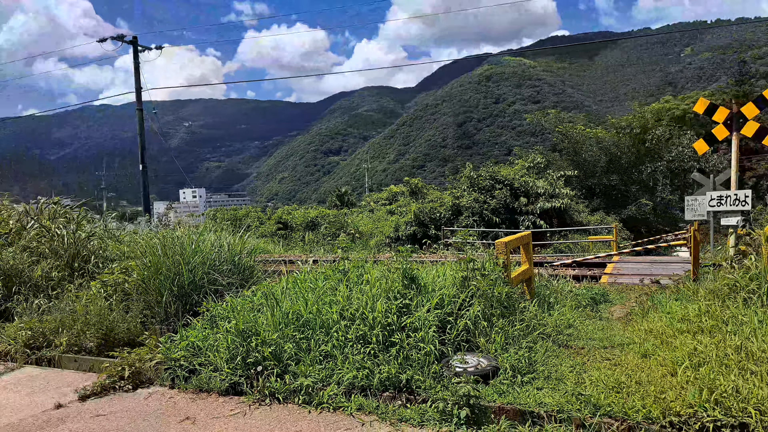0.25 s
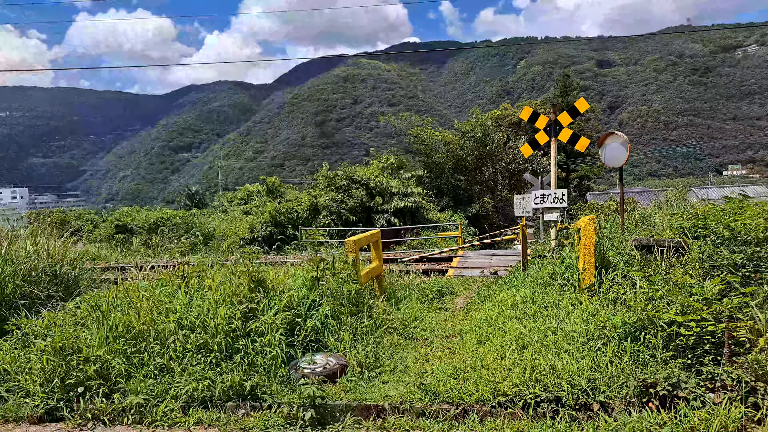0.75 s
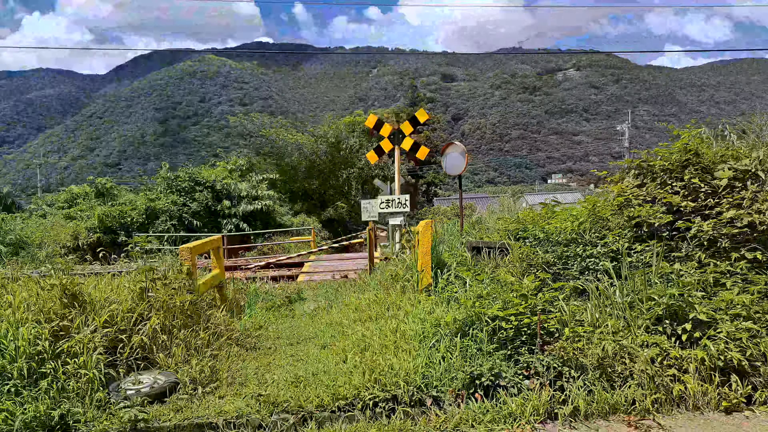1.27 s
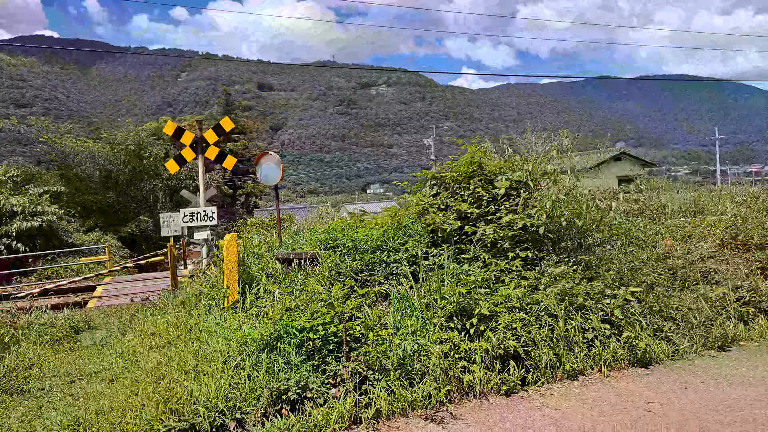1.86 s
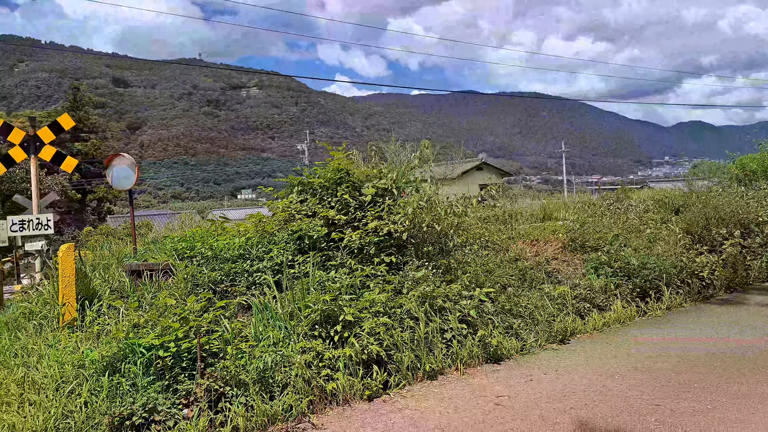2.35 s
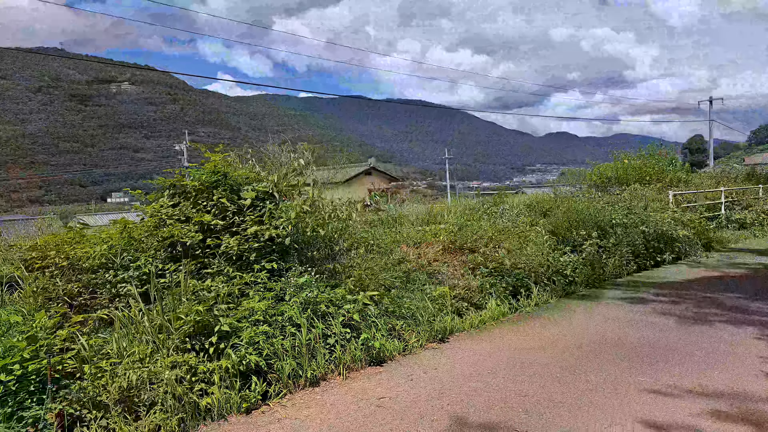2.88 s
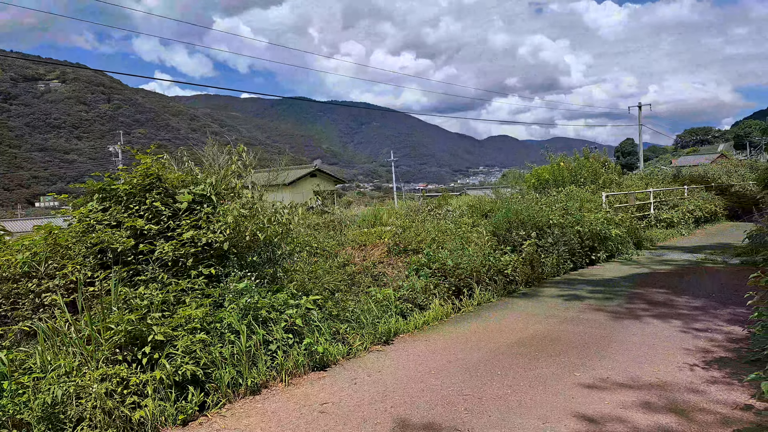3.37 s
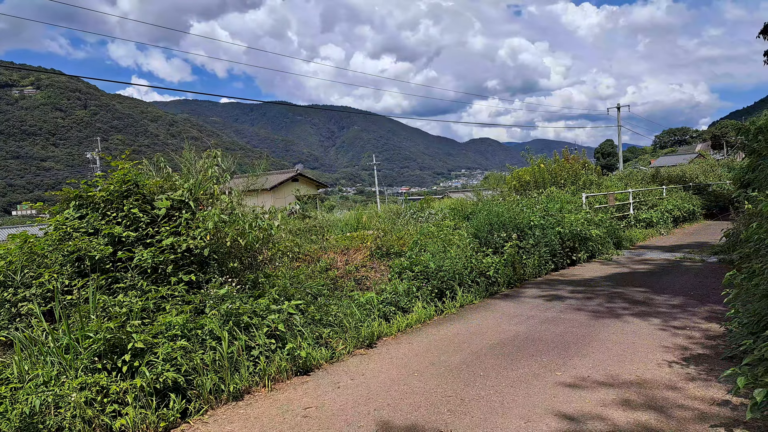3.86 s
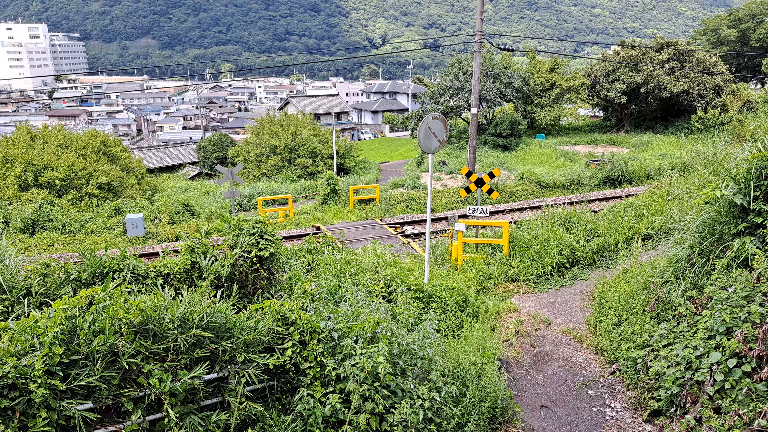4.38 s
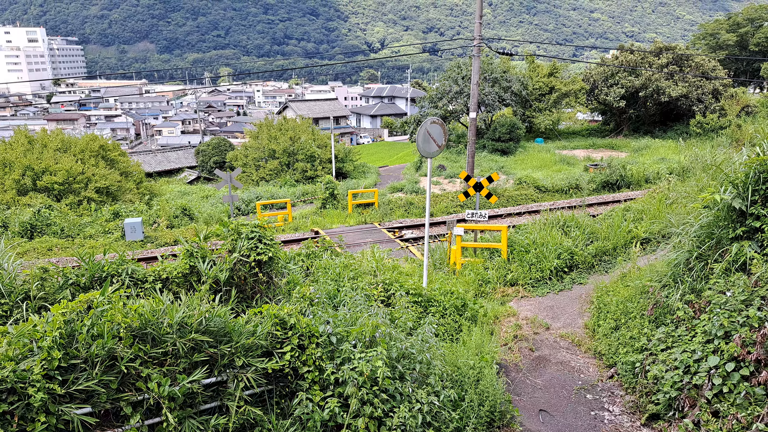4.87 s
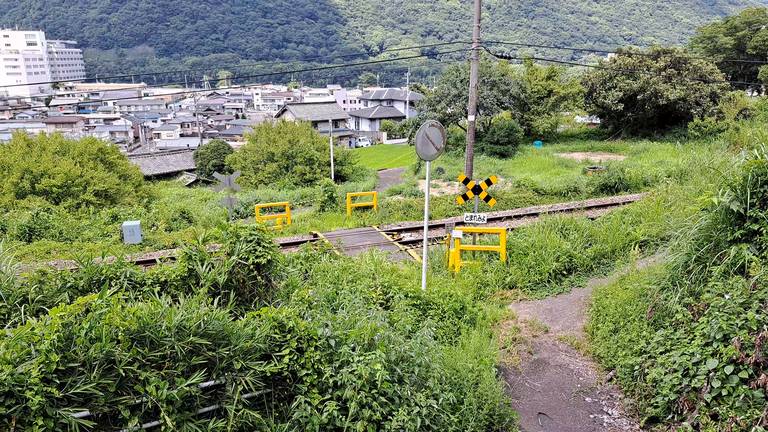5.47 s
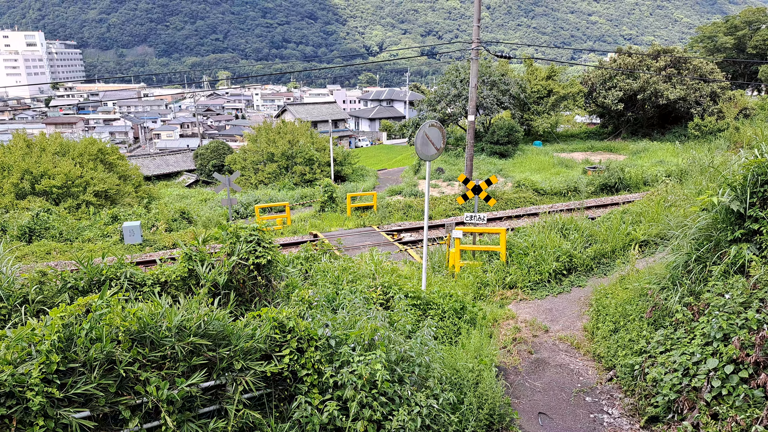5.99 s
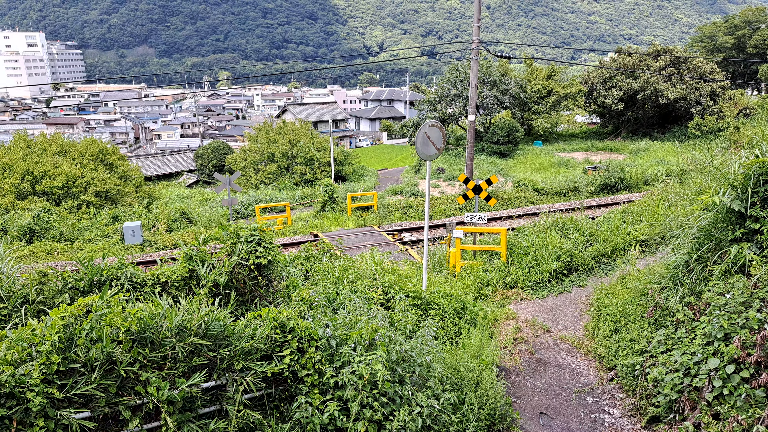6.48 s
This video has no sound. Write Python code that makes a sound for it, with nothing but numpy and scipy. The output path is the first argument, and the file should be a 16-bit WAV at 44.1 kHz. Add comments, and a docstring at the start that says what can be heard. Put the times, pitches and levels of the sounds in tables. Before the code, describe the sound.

Outdoors beside a grassy lane, a dense chorus of cicadas buzzes brightly, one close on the left, with bush crickets sizzling above. Wind thumps the right side of the microphone, strongest after one second, and a thin insect whistle joins. Just after four seconds the sound cuts, nearly silent for an instant, to a hillside with much softer insects, low distant town rumble and far birds chirping.

```python
"""Many cicadas buzz in the bushes beside a lane, one close by, as trains of clicks ringing through insect bodies.
Bush crickets throb at the top of the treble: noisy tooth strokes over a haze. Gusts of low noise hit the right
microphone, mostly at this first spot, and one insect whistles thinly.
After a cut, with a moment of near silence, we are up the hill: softer insects, the town rumbling below as
shaped low noise, and far birds calling in sliding tones."""
import sys
import numpy as np
from scipy import signal
from scipy.fft import rfft, irfft, next_fast_len
from scipy.io import wavfile
from scipy.ndimage import uniform_filter1d

SR = 44100
rng = np.random.default_rng(int(sys.argv[2]) if len(sys.argv) > 2 else 0)


def persist_wave(psi):
    """Save psi, clipped to +-1, as 16-bit WAV."""
    counts = np.round(np.clip(psi, -1, 1) * 32767).astype(np.int16)
    wavfile.write(sys.argv[1], SR, np.atleast_2d(counts).T)


N = 296793
TIME = np.arange(N) / SR
ECHO_SAMPLES = 8192
SIZE = next_fast_len(N + ECHO_SAMPLES)   # room for the echoes after the sound
HZ = np.maximum(np.arange(SIZE // 2 + 1) * SR / SIZE, 1)   # the pitch of each step in a spectrum
VOICE_SPLIT_HZ, CICADA_TOP_HZ = 7000, 10500


def from_db(db):
    """Decibels to gain."""
    return 10 ** (np.asarray(db) / 20)


def rms_one(x):
    """Each channel scaled to unit power."""
    return x / np.sqrt(np.mean(x ** 2, axis=-1, keepdims=True) + 1e-20)


def in_time(rows):
    """The columns of a curve, one value per sample."""
    seconds, *columns = np.transpose(rows)
    return [np.interp(TIME, seconds, column) for column in columns]


def panned(left_db):
    """Left and right gains of unit mean power; left_db is left minus right."""
    gains = from_db(np.array([[.5], [-.5]]) * left_db)
    return gains / np.sqrt(np.mean(gains ** 2, axis=0))


def drift(rate):
    """Smooth chance of spread 1 that changes about rate times a second."""
    knots = rng.standard_normal(int(N / SR * 2 * rate) + 3)
    return rms_one(np.interp(TIME * 2 * rate, np.arange(len(knots)), knots))


def band(low_hz, high_hz, order=24):
    """Gain of a flat band; a higher order gives steeper edges."""
    low_edge = 1 + (low_hz / HZ) ** (2 * order)
    high_edge = 1 + (HZ / high_hz) ** (2 * order)
    return (low_edge * high_edge) ** -.5


def colour(points):
    """Left and right gains drawn through the points of a colour table."""
    hz, *sides = np.transpose(points)
    return from_db([np.interp(np.log(HZ), np.log(hz), side) for side in sides])


def resonance(hz, width_hz):
    """Response of one resonance, 1 on top."""
    return 1 / (1 + 1j * (HZ ** 2 - hz ** 2) / (HZ * width_hz))


def sounding(spectrum):
    """A spectrum turned into sound of unit power."""
    return rms_one(irfft(spectrum, SIZE)[..., :N])


def foliage(x, t60, scatter_db):
    """Spectrum at two microphones: the direct sound, then a dying spray of echoes from leaves and ground."""
    t = np.arange(ECHO_SAMPLES) / SR
    paths = rng.standard_normal((2, len(t))) * from_db(-60 * t / t60)   # 60 dB down after t60 seconds
    paths *= from_db(scatter_db) / np.linalg.norm(paths, axis=1, keepdims=True)
    paths[[0, 1], rng.integers(0, 18, 2)] += 1   # direct sound, up to 17 samples late on each side
    return rfft(x, SIZE) * rfft(paths, SIZE)


def tymbal(per_s, jitter, uneven_db, count=16000):
    """Ribs buckle one after another: a train of clicks, uneven in time and strength."""
    chance = rng.standard_normal((count, 2))
    gaps = np.abs(1 + jitter * chance[:, 0])
    at = (np.cumsum(gaps) / per_s * SR).round().astype(int)
    return np.bincount(at[at < N], from_db(uneven_db * chance[at < N, 1]), N)


def throb(per_s, depth_db, wander=0.038):
    """Level swings with the strokes of the body, whose pace wanders a little."""
    turns = rng.random() + np.cumsum(per_s * (1 + wander * drift(2.1))) / SR
    return from_db(depth_db * np.sin(2 * np.pi * turns))


def cicada_group(throb_db, flutter_db, haze_db, count=5):
    """Several cicadas, each with its own click rate, throb and echoes, over the blur of countless farther ones."""
    out = from_db(haze_db) * rfft(rng.standard_normal((2, N)), SIZE)
    for _ in range(count):
        song = rms_one(tymbal(rng.uniform(230, 560), jitter=.05, uneven_db=1.5))
        song = song * throb(rng.uniform(14, 20), throb_db) * from_db(flutter_db * drift(9))
        out = out + foliage(song, t60=0.1, scatter_db=8)
    return out


def shimmer(spectrum, depth_db, count=6):
    """Singers at neighbouring pitches swell and fade apart: overlapping bands, sharing a few slow gains in turn."""
    spacing_hz = 220
    swells = from_db(depth_db * np.array([drift(7) for _ in range(count)]))
    out = 0
    for k, swell in enumerate(swells):
        away = np.abs((HZ / spacing_hz - k) % count - count / 2)
        share = np.maximum(1 - away, 0)
        out = out + swell * irfft(spectrum * share, SIZE)[:, :N]
    return rms_one(out)


# How loud the cicadas are at each spot, before the gains given in scene().
# Each row: time in seconds, level of the lower voices in dB, level of the higher voices in dB.
LANE_CICADAS = [(0.1, -25, -22.5), (0.24, -24, -22), (2.86, -28.5, -24.5), (3.73, -26, -24),
                (4.1, -27.5, -24.5)]
HILL_CICADAS = [(4.32, -39, -40), (4.44, -41, -40), (5.13, -40.5, -40.5), (5.77, -35.5, -35.5),
                (6.65, -35, -34.5)]
# Which pitches the cicadas favour at each spot; only the shape within each voice range and side counts.
# Each row: frequency in Hz, left relative level in dB, right relative level in dB.
LANE_COLOUR = [(2020, -49, -31.5), (2765, -33.5, -24.5), (3420, -63, -33.5), (4085, -30.5, -23),
               (4476, -23, -11), (4685, -21.5, -9), (5720, -11.5, 1), (6360, -17, -6.5), (7600, -7, -0.5),
               (7180, -8, 2), (8024, -1, 6.5), (9170, -5.5, -1), (9800, -10, -10), (11100, -13.5, -14)]
HILL_COLOUR = [(1940, -34, -43), (2750, -34, -17), (3480, -41, -24), (4060, -28, -19.5),
               (4600, -20.5, -5.5), (5040, -15, -1.5), (5550, -11.5, 4.5), (6200, -13.5, 5.5),
               (7000, -6.5, -4), (7700, -7, -3), (8440, -10, -5), (9040, -10, -15.5), (10150, -18.5, -19.5),
               (11000, -44, -6.5)]


def cicadas(curve, points, throb_db, flutter_db, haze_db, low_gain_db, high_gain_db):
    """Lower and higher kinds of cicada: clicks and haze shaped by the bodies, the higher ones throbbing half as deep."""
    low_db, high_db = in_time(curve)
    body = colour(points)
    low = cicada_group(throb_db, flutter_db, haze_db) * body * band(1954, VOICE_SPLIT_HZ)
    high = cicada_group(throb_db / 2, flutter_db, haze_db) * body * band(VOICE_SPLIT_HZ, CICADA_TOP_HZ)
    low = shimmer(low, depth_db=1.32) * from_db(low_db + low_gain_db) * panned(-7.5)
    high = shimmer(high, depth_db=1.1) * from_db(high_db + high_gain_db) * panned(-3)
    return low + high


# How loud the close cicada is. Each row: time in seconds, level in dB.
CLOSE_CICADA = [(0, -29.5), (1.3, -29.5), (2.0, -31.3), (3.1, -31.5), (3.8, -33.7)]


def close_cicada():
    """Nearly even clicks ring one abdomen, so that a few broad lines stand out."""
    level_db, = in_time(CLOSE_CICADA)
    clicks = tymbal(per_s=501, jitter=.012, uneven_db=1.0)
    arriving = foliage(clicks * from_db(1.0 * drift(10)), t60=.03, scatter_db=-5)
    return sounding(arriving * resonance(8150, 1300) ** 2) * from_db(level_db) * panned(-8)


# How loud the bush crickets are at each spot, before the gain given in scene().
# Each row: time in seconds, level in dB.
LANE_CRICKETS = [(0.1, -28.5), (2.57, -31), (4.1, -31)]
HILL_CRICKETS = [(4.32, -46), (5.21, -46.5), (5.64, -42), (6.65, -41)]
# Which pitches the bush crickets favour; only the shape on each side counts.
# Each row: frequency in Hz, left relative level in dB, right relative level in dB.
CRICKET_COLOUR = [(10860, -7.5, -15.5), (11450, -3, -4.5), (13000, -7.5, 1), (15100, 0.8, 0),
                  (15400, -12, 3.5)]


def bush_crickets(curve, throb_db, gain_db, pan_db):
    """Singers on both sides scrape their files in step, about 17 times a second, over a haze of farther ones."""
    level_db, = in_time(curve)
    strokes = throb(17.3, throb_db, wander=.025)
    teeth = np.array([tymbal(per_s=1700, jitter=.35, uneven_db=2.0) for side in ("left", "right")])
    haze = from_db(8) * rng.standard_normal((2, N))
    song = rms_one(teeth) * strokes + haze
    coloured = rfft(song, SIZE) * colour(CRICKET_COLOUR) * band(CICADA_TOP_HZ, 15600)
    return sounding(coloured) * from_db(level_db + gain_db) * panned(pan_db)


# The gusts at the right microphone.
# Each row: time it reaches full strength in seconds, hold in seconds, level of the slow eddies in dB.
GUSTS = [(0, .01, -34.5), (0.303, 0.19, -40.5), (1.052, .02, -42), (1.309, .25, -22.5), (1.406, .09, -17),
         (1.59, 0.037, -31), (1.725, 0.038, -32), (1.969, 0.098, -30), (2.149, .03, -28.5),
         (2.234, 0.017, -25.5), (2.381, 0.041, -21.5), (2.516, 0.066, -30), (3.018, .03, -32),
         (3.113, 0.033, -31), (3.26, 0.028, -35.5), (3.84, 0.026, -41.5), (3.982, .1, -37),
         (4.445, 0.14, -39), (4.935, 0.016, -34.5)]
GUST_RISE_DB_PER_S, GUST_FALL_DB_PER_S = 391, 292


def gust_strength():
    """Each gust rises, holds and dies away; the strongest one rules. In dB."""
    strengths = []
    for s, hold, db in GUSTS:
        rise_db = GUST_RISE_DB_PER_S * np.maximum(s - TIME, 0)
        fall_db = GUST_FALL_DB_PER_S * np.maximum(TIME - s - hold, 0)
        strengths.append(db - rise_db - fall_db)
    return np.max(strengths, axis=0)


def evened(x, count=3000):
    """Noise with its slow swells taken out, so that the gust alone sets its strength."""
    return x / np.sqrt(uniform_filter1d(x ** 2, count, axis=-1) + 1e-6)


def wind():
    """Eddies buffet the right microphone, the fast ones mostly in strong gusts; the left one is sheltered."""
    slow_db = gust_strength()
    # at a gust of -20 dB the fast eddies have -24.5 dB; they grow 1.52 dB per dB of gust
    fast_db = -24.5 + 1.52 * (slow_db + 20)
    eddies = rfft(rng.standard_normal((2, N)), SIZE)
    slow = evened(sounding(eddies * band(40, 70, order=5)))
    fast = evened(sounding(eddies * band(112, 150, order=5)))
    return (slow * from_db(slow_db) + fast * from_db(fast_db)) * from_db([[-30], [0]])


LANE_RUMBLE_DB = -53.5   # steady by the lane
# The swelling rumble on the hill, before the gain given in scene(). Each row: time in seconds, level in dB.
HILL_RUMBLE = [(4.3, -52), (4.33, -50.5), (5.2, -52), (5.5, -47.5), (5.8, -48.5), (5.97, -46), (6.52, -46),
               (6.7, -45.5)]
# Which pitches the far rumble favours at each spot; only the shape on each side counts.
# Each row: frequency in Hz, left relative level in dB, right relative level in dB.
LANE_AIR = [(22, -18, -8), (41, -5, 6), (59.3, 5, -1.5), (90, -11, -8), (128, -8.5, -19), (222, -16.5, -11),
            (453, -18, -18.5), (700, -20.5, -18), (1040, -20.5, -19.5), (1500, -36, -20),
            (2000, -38, -20.5)]
HILL_AIR = [(22, -30, -24), (41.7, -1, 7.5), (60, 1, -0.5), (93, -3.5, -3), (143, -16.5, -16),
            (240, -12.5, -10), (470, -17.5, -14.5), (700, -21.5, -18), (1000, -26, -18.5),
            (1450, -29.5, -21.5), (2020, -32, -19)]


def rumble(level_db, points, alike, alike_hz):
    """Far traffic and air as coloured noise; long waves reach both microphones more alike."""
    mid, side = rfft(rng.standard_normal((2, N)), SIZE)
    shared = alike / (1 + (HZ / alike_hz) ** 4)
    air = np.sqrt(1 + shared) * mid + np.sqrt(1 - shared) * side * [[1], [-1]]
    return sounding(air * colour(points) * band(22, 2500, order=6)) * from_db(level_db)


def glide(s, length, start_hz, end_hz, hoarse):
    """One bird sound: a tone that swells and fades as its pitch slides."""
    progress = np.clip((TIME - s) / length, 0, 1)
    hz = (start_hz + (end_hz - start_hz) * progress) * hoarse
    return np.sin(np.pi * progress) * np.sin(2 * np.pi * np.cumsum(hz) / SR)


# A far bird's quick upward chirps. Each row: start in seconds, peak level in dB before echoes and panning.
CHIRPS = [(4.272, -44.5), (4.62, -49), (5.071, -46), (5.468, -46), (5.72, -49), (5.888, -42), (6.31, -53.5)]
CHIRP_S, CHIRP_FROM_HZ, CHIRP_TO_HZ = 0.0305, 2100, 3270
# Far birds' held notes.
# Each row: start in seconds, middle pitch in Hz, peak level in dB before echoes and panning.
NOTES = [(.74, 1124, -61), (4.32, 3480, -53.5), (4.42, 2720, -52.5), (4.43, 1375, -57), (5.12, 3600, -54),
         (5.3, 1420, -58), (5.95, 3630, -49.5), (6.11, 1393, -54), (6.14, 2840, -51)]
NOTE_S, NOTE_RISE = 0.195, .04   # each note rises by this share of its pitch
CHIRP_HOARSE, NOTE_HOARSE = 0.0251, .06   # flutter of the pitch, as a share of it


def birds():
    """Chirps and hoarse held notes, blurred by echoes; almost all of them on the hill."""
    flutter = drift(200)
    calls = np.zeros(N)
    for s, db in CHIRPS:
        calls += from_db(db) * glide(s, CHIRP_S, CHIRP_FROM_HZ, CHIRP_TO_HZ, 1 + CHIRP_HOARSE * flutter)
    for s, hz, db in NOTES:
        start_hz, end_hz = hz * (1 - NOTE_RISE / 2), hz * (1 + NOTE_RISE / 2)
        calls += from_db(db) * glide(s, NOTE_S, start_hz, end_hz, 1 + NOTE_HOARSE * flutter)
    arriving = foliage(calls, t60=.25, scatter_db=-1)
    return irfft(arriving, SIZE)[:, :N] * panned(-6)


# One insect holding a thin whistle. Each row: time in seconds, pitch in Hz, level in dB.
WHISTLE = [(2.1, 6380, -36), (3.05, 6580, -33), (3.45, 6600, -34), (3.8, 6350, -32), (4.2, 6580, -55)]


def whistler():
    """A narrow tone from the grass on the right, its pitch trembling quickly."""
    hz, level_db = in_time(WHISTLE)
    tone = np.sin(2 * np.pi * np.cumsum(hz + 55 * drift(120)) / SR)
    return sounding(foliage(tone, t60=0.063, scatter_db=4)) * from_db(level_db) * panned(-25)


def scene():
    """The lane, a cut with a short near-silent gap, then the hillside.

    Gusts come mostly at the lane and just after the cut; birds almost only on the hill."""
    leave_s, arrive_s = 4.203, 4.236
    lane = cicadas(LANE_CICADAS, LANE_COLOUR, throb_db=2.5, flutter_db=0.62, haze_db=10.5,
                   low_gain_db=4, high_gain_db=3)
    lane += close_cicada() + whistler()
    lane += bush_crickets(LANE_CRICKETS, throb_db=4.0, gain_db=3.5, pan_db=-.8)
    lane += rumble(LANE_RUMBLE_DB, LANE_AIR, alike=0.43, alike_hz=900)

    hill = cicadas(HILL_CICADAS, HILL_COLOUR, throb_db=3.0, flutter_db=1.4, haze_db=9,
                   low_gain_db=6.5, high_gain_db=7)
    hill += bush_crickets(HILL_CRICKETS, throb_db=1.0, gain_db=6.5, pan_db=-1.7)
    town_db, = in_time(HILL_RUMBLE)
    hill += rumble(town_db + 6.5, HILL_AIR, alike=0.89, alike_hz=610)

    gap = np.where(TIME < arrive_s, from_db(-24.5), 1)
    return np.where(TIME < leave_s, lane, hill * gap) + wind() + birds()


def record(dry):
    """The top is cut steeply above 15.8 kHz."""
    return signal.sosfilt(signal.ellip(12, .1, 90, 15800, fs=SR, output="sos"), dry)


dry = scene()
out = record(dry)
persist_wave(out)
```